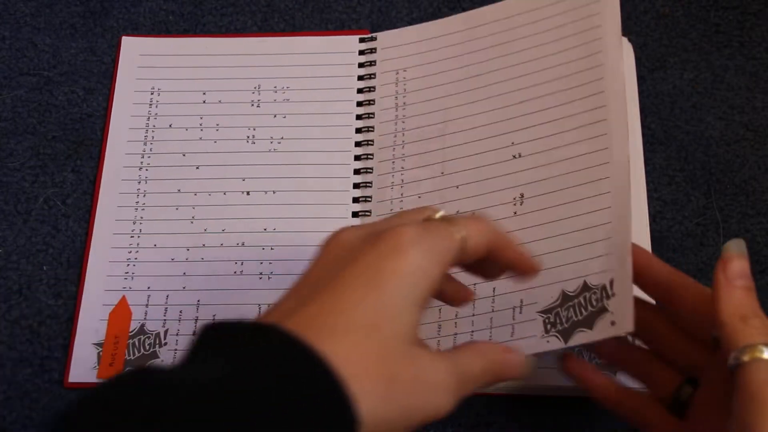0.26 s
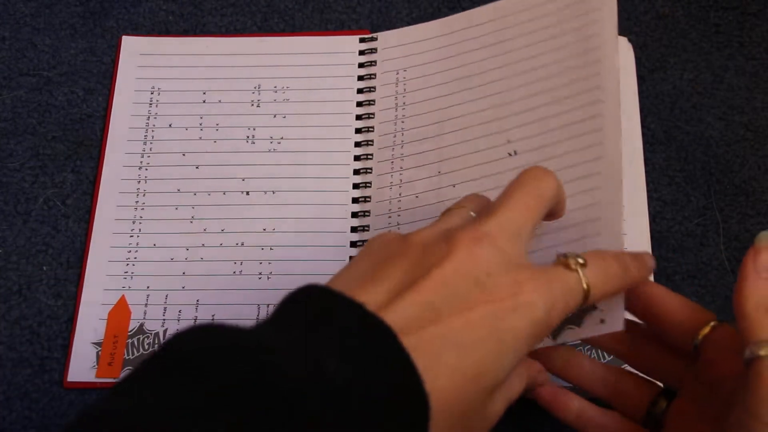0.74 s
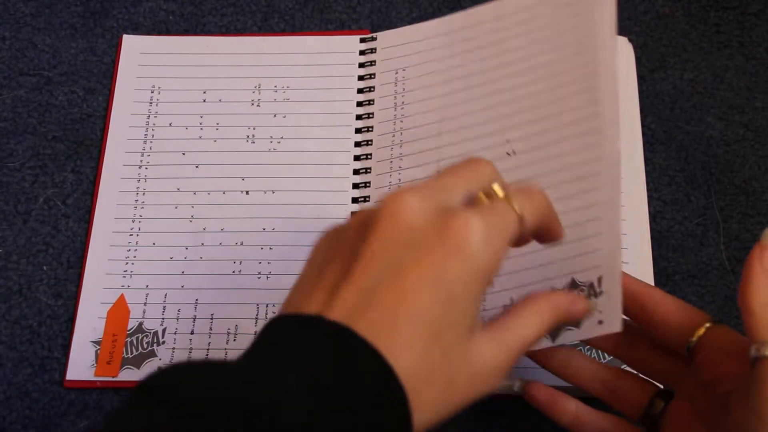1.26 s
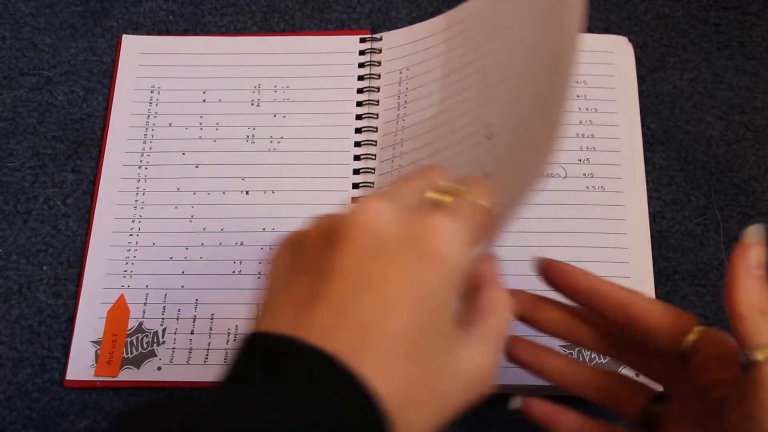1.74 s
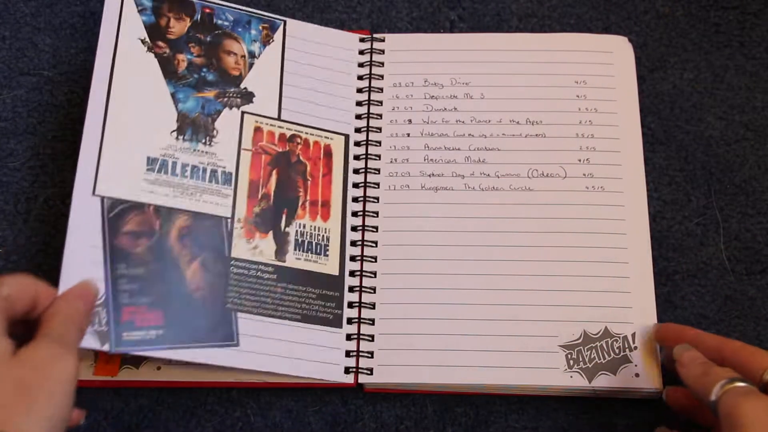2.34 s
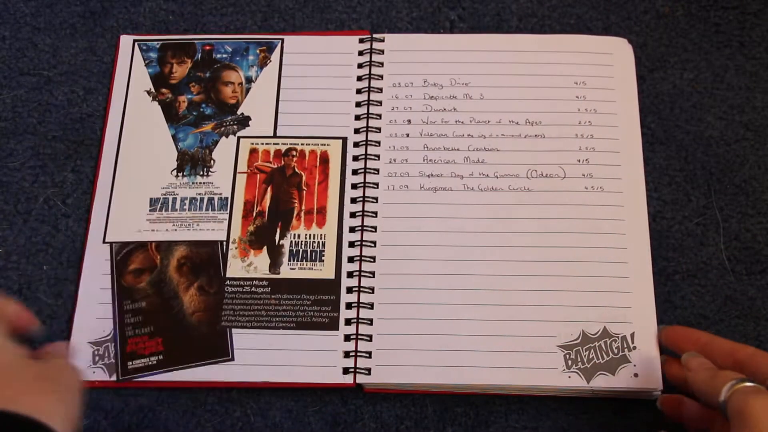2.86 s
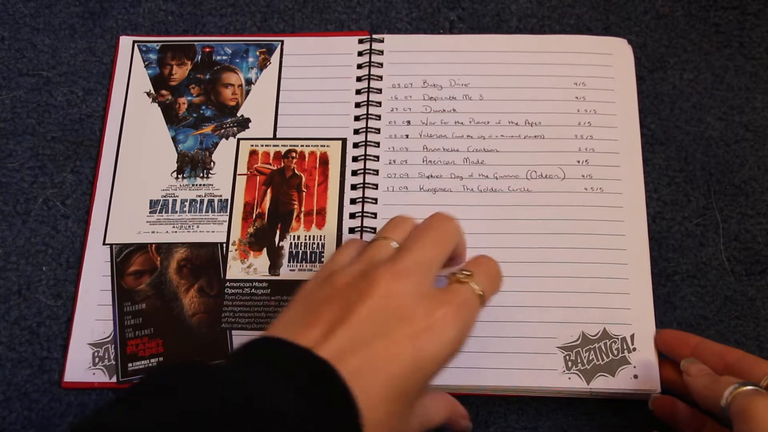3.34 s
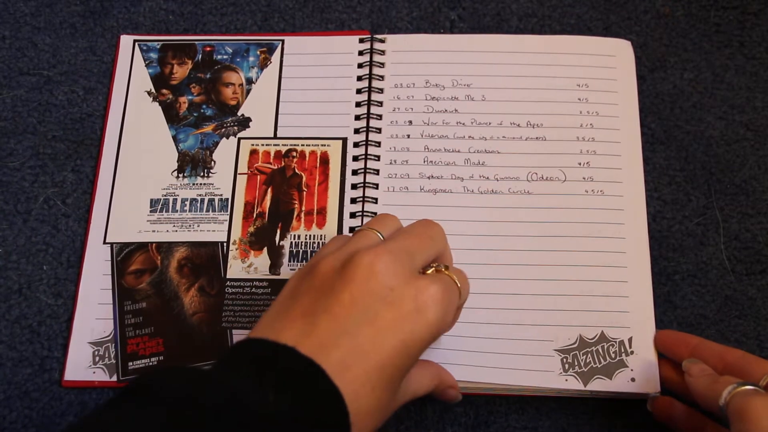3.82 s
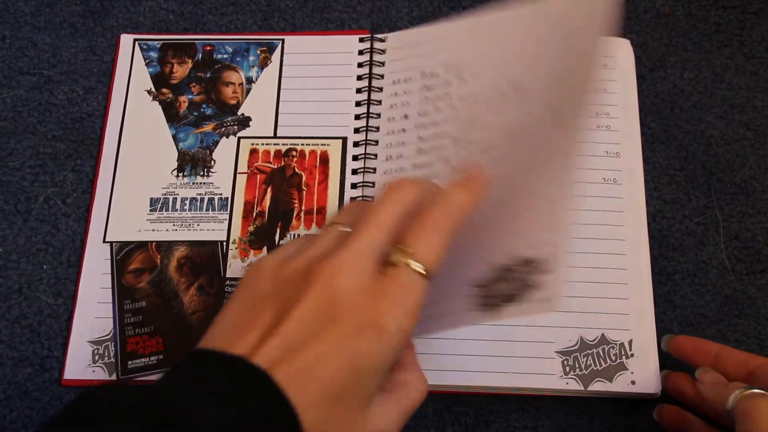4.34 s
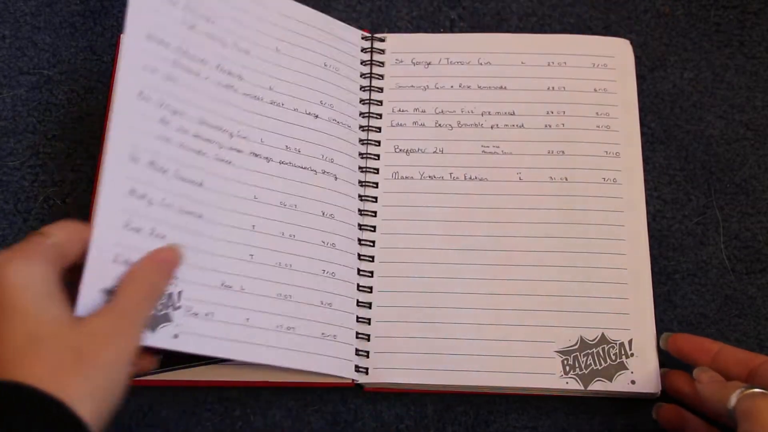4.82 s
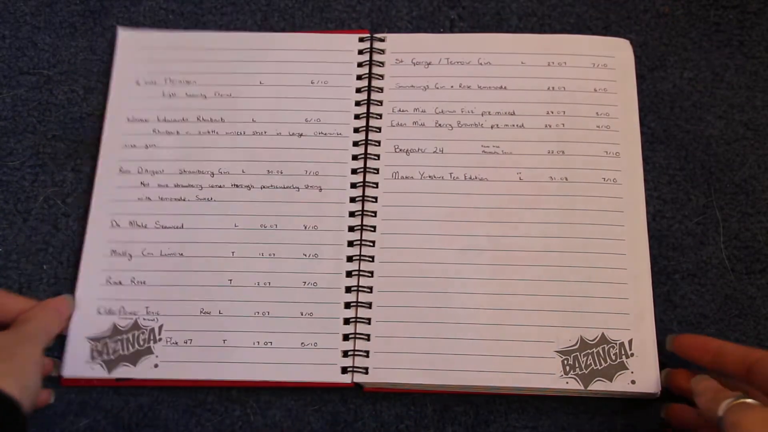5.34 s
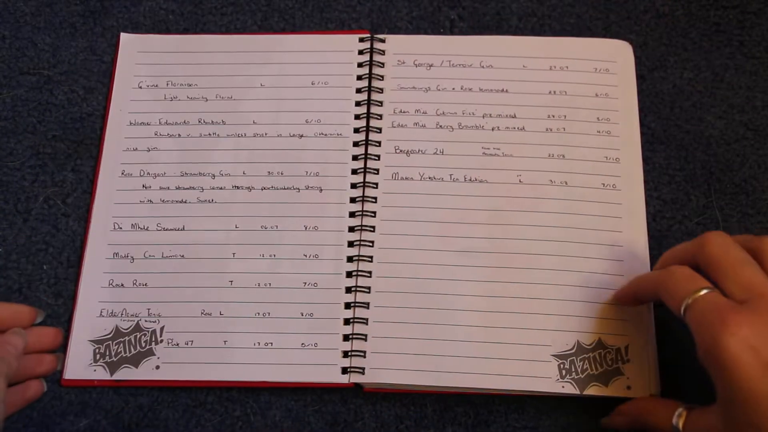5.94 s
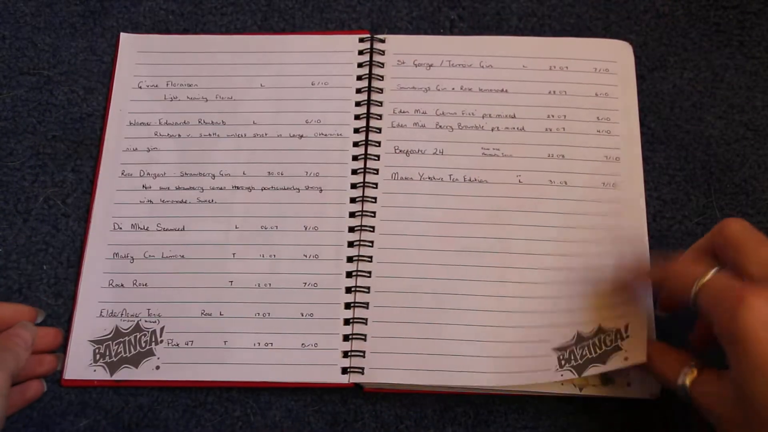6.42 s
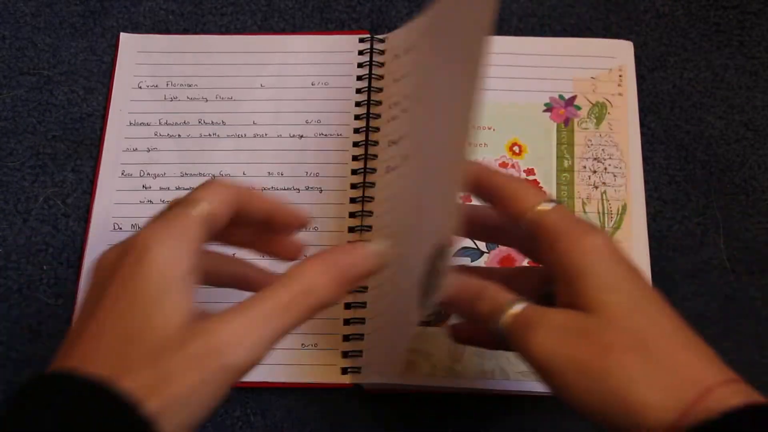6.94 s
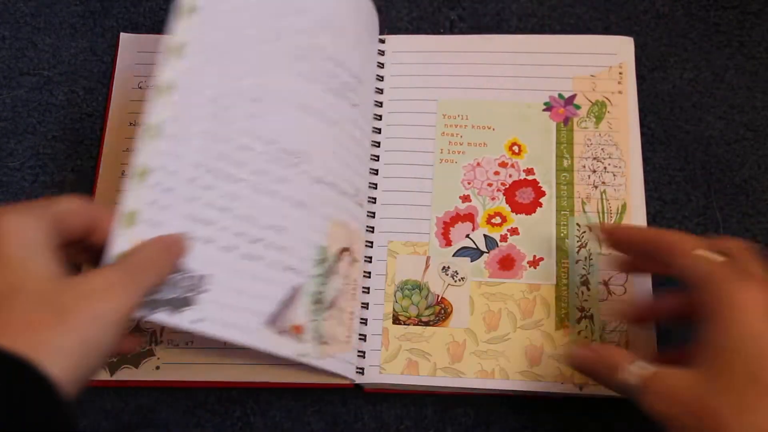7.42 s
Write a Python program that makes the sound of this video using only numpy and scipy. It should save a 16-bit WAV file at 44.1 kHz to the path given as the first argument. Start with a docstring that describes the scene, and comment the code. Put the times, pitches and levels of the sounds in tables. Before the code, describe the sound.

Pages of a wire-bound notebook are turned by hand, close up in a small carpeted room. Faint rubbing leads to a hard cluster of snaps just after one second, then swishing turns and flaps. After a near-quiet pause come brighter swishes with two loud cracks, and later a softer last turn ending in rapid crackling. Faint hiss and low hum lie underneath.

```python
"""Pages of a wire-bound notebook are lifted, turned and laid flat by hand on a carpet in a small quiet room.
From the start, low hum tones and noise-like hiss lie under the grainy swish of paper on paper and skin,
made of friction noise and random grains. Soon knocks and sharp snaps of buckling sheets ring as short
resonant bursts; from about 1 s narrow noise bands sing in the swish, and from 1.6 s bends crackle with
random ticks. Past 5 s a soft drone of resonant noise swells and fades while the paper goes on."""
import sys
import numpy as np
from scipy import signal
from scipy.io import wavfile

SR = 44100
rng = np.random.default_rng(int(sys.argv[2]) if len(sys.argv) > 2 else 0)


def makeup_ratio(level_db):
    """Linear amplitude ratio for a level in decibels (20 dB per factor of ten)."""
    decades = np.asarray(level_db, float) / 20
    return 10 ** decades


def unload_wav(signal):
    """Save mono or channel-first audio to the path in sys.argv[1] as 16-bit WAV at rate SR, clipped to [-1, 1]."""
    wavfile.write(
        sys.argv[1],
        SR,
        np.round(np.clip(np.atleast_2d(signal).T, -1, 1) * 32767).astype(np.int16),
    )


N = 338247   # length in samples

HALF_OCTAVES = 22 * 2 ** np.arange(0, 10.5, .5)   # band edges in Hz

# The four sliding parts, low to high: flexing sheet, rub, edge scrape, fine hiss: centre_hz
PART_CENTRES = [480, 1600, 4400, 10000]
# Balance of the four parts in an even stroke, re the stroke's base level: level_db
PART_BALANCE = [-17.5, -1.6, -0.85, -10.5]
# Floor of the four parts between strokes, before the colour: level_db
PART_FLOORS = [-94, -75, -70, -71]
# How far each of the four parts follows a stroke's brightness: factor (no unit)
BRIGHTNESS_FACTORS = [-1.8, -0.82, 0.15, 1.03]
# Strokes of paper over paper and skin: start_s, fastest_s, end_s, base_level_db, brightness_db (per unit factor)
STROKES_OF_PAPER = [(0, 0.048, 0.22, -55.5, -2.5), (0.21, 0.288, 0.39, -64.5, -4),
                    (0.54, 0.574, .6, -61, -11), (0.615, 0.616, 0.75, -56, -4.5),
                    (0.793, 0.869, 0.88, -58, -7), (.93, 0.94, 1.04, -61.5, -3),
                    (0.99, 1.037, 1.14, -57.5, -1), (1.085, 1.207, 1.22, -45, 0),
                    (1.49, 1.584, 1.63, -52, -5), (1.608, 1.642, 1.83, -49.5, -5),
                    (1.75, 1.82, 2.35, -58, -2.5), (1.933, 1.976, 2.06, -62, 3),
                    (2.03, 2.043, 2.06, -57, -2), (2.1, 2.105, 2.17, -55, 2), (2.15, 2.2, 2.42, -52, 0),
                    (2.244, 2.274, 2.43, -48, 2), (2.406, 2.497, 2.52, -55, -2.5),
                    (2.506, 2.552, 2.6, -68.5, -17.5), (2.574, 2.648, 2.75, -49.5, 0.5),
                    (2.705, 2.787, 2.95, -46.5, -0.5), (2.785, 2.824, 2.91, -40.5, 3),
                    (3.354, 3.368, 3.37, -58, -1), (3.423, 3.438, 3.57, -53.5, -4.5),
                    (3.52, 3.558, 3.62, -55.5, -9), (3.935, 3.938, 3.96, -55, 0),
                    (3.963, 4.028, 4.15, -55.5, 0), (4.143, 4.185, 4.21, -48, 0.5),
                    (4.207, 4.213, 4.28, -49, 2.5), (4.238, 4.287, 4.5, -52.5, 2.5),
                    (4.33, 4.381, 4.51, -47, 1.5), (4.512, 4.505, 4.66, -51, 1.5),
                    (4.56, 4.625, 4.9, -62, 9), (4.677, 4.72, 4.8, -52.5, -9.5),
                    (4.834, 4.906, 5.5, -52.5, 1.5), (4.94, 4.953, 5.1, -58, -14),
                    (4.961, 5.077, 5.1, -46, 2.5), (5.1, 5.152, 5.45, -44.5, 3.5),
                    (5.23, 5.352, 5.35, -44.5, 7.5), (5.484, 5.605, 5.8, -54.5, -1),
                    (5.698, 5.78, 5.83, -58, -3), (5.833, 5.848, 6.06, -57, -3.5),
                    (5.982, 6.013, 6.16, -58, -7.5), (6.197, 6.231, 6.2, -57.5, -4),
                    (6.313, 6.325, 6.52, -58.5, -6.5), (6.384, 6.445, 6.5, -45.5, 7),
                    (6.497, 6.576, 6.8, -53, 7), (6.781, 6.798, 6.95, -53.5, -6.5),
                    (6.926, 6.944, 7.05, -60.5, -6.5), (7.027, 7.143, 7.35, -52.5, 4),
                    (7.143, 7.165, 7.21, -58, -11.5), (7.215, 7.225, 7.27, -60.5, -16),
                    (7.25, 7.274, 7.4, -55, -10.5), (7.482, 7.493, 7.535, -51, -9),
                    (7.53, 7.616, 7.66, -52, -7)]
STROKE_ROUNDNESS = 1.37   # power on the rise and fall of a stroke's amplitude
STROKE_TAIL_T60_S, STROKE_TAIL_DB = 0.083, -8.5   # the room carries each stroke on
# Low rustle of flexing sheets and sleeves, before the colour: time_s, level_db
FLEXING_RUSTLE = [(0.0, -66), (1.54, -66), (1.69, -61), (1.96, -66), (2.33, -59), (3.07, -69.5), (3.5, -58),
                  (3.78, -70), (4.21, -61.5), (4.36, -58), (5.26, -66.5), (5.7, -61.5), (5.9, -56.5),
                  (6.26, -62), (6.58, -64.5), (7.2, -61), (7.35, -57), (7.67, -82)]
# Lift of the fine hiss of the strokes: time_s, lift_db
FINE_HISS_LIFT = [(0, .1), (1.0, 3), (1.18, 3), (1.6, 2.5), (2.1, 3.5), (2.35, -1), (2.6, -1), (2.85, -0.7),
                  (3.5, .1), (4.2, 2.5), (4.33, -10), (4.4, -2), (4.7, 2), (5.05, -6), (5.15, 1.5),
                  (5.35, -1.5), (5.6, -3), (5.75, 13.5), (6.0, 2), (6.33, 15), (6.45, .1), (6.6, -15),
                  (7.2, -3), (7.67, 12)]
# Relative spectrum of the swish: frequency_hz, level_db
SWISH_COLOUR = [(170, -3), (300, -6), (550, -4), (1000, -6), (3000, -3.5), (7000, -2), (11000, -3.5),
                (16000, -7)]
# Nominal left-right likeness of the swish: frequency_hz, likeness (-1 to 1)
SWISH_LIKENESS = [(250, 0.74), (1400, 0.84), (3000, 0.71), (7000, 0.28), (15000, 0.085)]
# Air pocket under the lifted sheet: time_s, peak_spacing_hz, echo_strength (no unit, negative = inverted)
AIR_POCKET = [(0, 2630, .08), (1.0, 1630, -0.025), (1.2, 1640, 0.46), (1.5, 1190, -0.15), (2.0, 2640, 0.03),
              (2.35, 2590, .32), (2.45, 1400, -0.086), (2.65, 1350, 0.24), (2.9, 1400, -0.11),
              (3.5, 980, 0.13), (4.3, 970, 0.27), (4.36, 2070, 0.15), (4.98, 1900, -0.021),
              (5.14, 1950, -0.017), (5.18, 1360, 0.069), (5.38, 1430, 0.092), (6.45, 3040, -0.13),
              (6.75, 1440, 0.16), (7.67, 1390, -0.21)]
# Room air and microphone hiss, relative spectral density: frequency_hz, level_db (per Hz)
HISS_SPECTRUM = [(15, -59), (30, -21), (60, -15), (97, -3.5), (141, -10.5), (185, -9.5), (354, -18.5),
                 (900, -18.5), (3000, -24.5), (8000, -32.5), (13000, -35.5), (16000, -50)]
# Left-right likeness of the hiss: frequency_hz, likeness (-1 to 1)
HISS_SIDES = [(60, 0.66), (130, 0.48), (290, -0.5), (640, -0.57), (1410, -0.44), (3100, -0.53),
              (6820, -0.33), (15000, -0.099)]
# Low hum tones: pitch_hz, level_db (rms before the waver), waver_db
HUM_TONES = [(89.5, -71, 2), (99.3, -66, 1.5), (126, -93, -5)]
# Echoes from the nearest walls: delay_s, level_db (re direct)
WALL_ECHOES = [(0.0105, -25.5), (0.0198, -19)]
# Reverberation time of the room: frequency_hz, t60_s
REVERBERATION = [(300, 0.17), (800, 0.14), (2000, 0.13), (5500, 0.14), (12000, 0.19)]
TAIL_MID_DB, TAIL_SIDE_DB, WALL_DULL_HZ = -8, -19.5, 8050
CAPSULE_SIDE_DB, CAPSULE_SIDE_HZ = 10.5, 16700
# Knocks on the stack of pages: time_s, peak_db (of the stack alone, before the room)
KNOCKS = [(0.379, -46), (0.446, -35), (1.194, -24), (1.204, -25), (1.533, -30.5), (2.21, -42.5),
          (2.357, -42), (4.698, -44), (4.809, -49), (4.942, -45), (6.844, -41), (7.149, -46), (7.236, -45),
          (7.408, -32)]
# Buckles and catches: time_s, peak_db (of the burst before the room), ring_hz,
# body_db, crack_db (balance settings, before the fixed gains in snaps())
BUCKLES = [(0.382, -41, 1440, -30, -19), (0.448, -35, 1150, 4, -23), (.626, -39.5, 2140, -5, -25),
           (0.677, -42, 2880, -16, -5), (.881, -39, 2370, -19, -19), (.902, -43, 2500, -1, -17),
           (1.184, -28.5, 1770, 2, -3), (1.193, -15, 4770, -4, -12), (1.198, -12, 3640, -5.5, -37),
           (1.204, -11, 1080, 12, -19), (1.21, -19, 2200, 14, -28), (1.219, -22, 2220, -22, -15),
           (1.528, -34, 1080, -8, -29), (1.533, -28, 1050, 1, -10.5), (1.711, -35.5, 2500, -25, -15),
           (1.744, -35.5, 2540, -12, -16), (1.943, -38, 1050, -20, 0.5), (2.052, -36.5, 2880, -28, -11),
           (2.189, -30.5, 2530, -1, -3), (2.21, -21, 1470, 1, -6), (2.263, -29, 4940, -4, -16),
           (2.3, -30.5, 2600, 1, -3), (2.356, -13.5, 2400, 3.5, -4.5), (2.869, -29, 2300, -33, -25),
           (4.171, -30.5, 4900, -28, -15), (4.199, -35, 2000, -18, -13), (4.489, -29.5, 5050, -7, -16),
           (4.52, -34.5, 2540, -19, -8), (4.532, -31, 2860, -8, -14), (4.576, -33.5, 3140, -15, -15),
           (4.615, -29.5, 2880, -7, -4), (4.633, -31, 1150, -12, -11), (4.696, -22.5, 4320, -7.5, -31),
           (4.711, -35, 686, -8, -11), (4.756, -22.5, 2470, -14, -2.5), (4.809, -7.5, 4470, -0.5, -7.5),
           (4.943, -8, 2630, 5, -4.5), (6.309, -43.5, 2180, -23, -18), (6.401, -32.5, 1700, -7, 0),
           (6.45, -35, 1550, -17, -6), (6.797, -39, 2200, -16, -4), (6.845, -26, 1780, -15, -23),
           (7.147, -35.5, 910, 1, -11), (7.259, -37, 3370, -5, -15), (7.292, -42, 1270, -30, -28),
           (7.406, -28.5, 960, -30, -18), (7.414, -27.5, 1000, -4.5, -13), (7.513, -28, 1430, -16, -37),
           (7.544, -41, 1430, -12, -23), (7.556, -24.5, 1410, -11, -20), (7.57, -27.5, 1040, -12, -38),
           (7.586, -28.5, 1500, 3, -33), (7.607, -28, 2390, 15, -24), (7.654, -34.5, 990, -5, -10)]
BURST_T60_S, BURST_SHARPENS = 0.019, 0.57   # at a ring of 1500 Hz; power by which higher rings are shorter
# Narrow bands that sing in the swish: start_s, end_s, centre_hz, level_db (re rub part)
SINGING_BANDS = [(0.997, 1.1, 4440, -6), (1.104, 1.175, 1850, -6), (1.11, 1.197, 3000, -10),
                 (1.1, 1.196, 4800, -6), (1.11, 1.19, 8340, -12), (2.44, 2.73, 1380, -5),
                 (2.738, 2.866, 1470, -7.5), (4.202, 4.45, 2170, -6), (4.35, 4.46, 3970, -22),
                 (5.0, 5.124, 5600, -6), (5.149, 5.37, 5630, -6), (4.998, 5.173, 1840, -4.5),
                 (5.123, 5.327, 2940, -6), (6.491, 6.63, 3280, 0), (6.617, 6.73, 2500, -4),
                 (7.047, 7.178, 2270, -2)]
SINGING_WIDTH_HZ, SINGING_FADE_S = 420, 0.023
# Random crackle of a bending sheet: start_s, end_s, ticks_per_s, level_db (rms), centre_hz
CRACKLE_SPELLS = [(1.601, 1.77, 150, -63, 2300), (2.796, 2.884, 250, -54.5, 3200),
                  (4.685, 4.761, 200, -57.5, 810), (7.22, 7.31, 150, -52.5, 880),
                  (7.48, 7.638, 500, -49.5, 1490)]
CRACKLE_SPREAD_DB, CRACKLE_WIDTH = 6.5, 0.82   # width as a share of the centre frequency
# Course of the soft drone, held level beyond its ends: time_s, level_db (rms)
DRONE_COURSE = [(5.3, -71), (5.45, -60.5), (5.8, -63), (6.05, -62), (6.2, -91)]


def rms_one(x):
    """Normalise the mean power to one."""
    return x / np.sqrt(np.mean(x ** 2) + 1e-20)


def peak_at(x, db):
    """Scale the largest excursion to a given peak level."""
    return makeup_ratio(db) * x / np.abs(x).max()


def at_hz(points, hz):
    """Interpolate a spectrum linearly along a logarithmic frequency axis."""
    points = np.array(points)
    return np.interp(np.log(hz), np.log(points[:, 0]), points[:, 1])


def at_time(points, s):
    """Interpolate a level course linearly in time."""
    return np.interp(s, *np.transpose(points))


def band(x, low_hz, high_hz):
    """Band-pass filtering: only components between two edges are transmitted."""
    edges = [low_hz, min(high_hz, .9 * SR / 2)]
    return signal.sosfilt(signal.butter(2, edges, "band", fs=SR, output="sos"), x)


def resonance(x, hz, width_hz):
    """Damped resonance: a two-pole peak with gain near 1 on top."""
    r = np.exp(-np.pi * width_hz / SR)
    poles = [1, -2 * r * np.cos(2 * np.pi * hz / SR), r * r]
    return signal.lfilter(np.array([1, 0, -1]) * (1 - r * r) / 2, poles, x)


def drift(rate_hz):
    """Slow random fluctuation of spread 1: low-passed noise, computed at every 40th sample."""
    r = np.exp(-80 * np.pi * rate_hz / SR)
    white = rng.standard_normal(N // 40 + 2002)
    slow = signal.lfilter([1], [1, -2 * r, r * r], white)[2000:]   # the filter has settled
    return np.interp(np.arange(N) / 40, np.arange(len(slow)), rms_one(slow))


def pocket_echo(x):
    """Comb filtering: sound bounces in the wedge of air between sheet and page, which opens and closes."""
    s, spacing_hz, strength = np.transpose(AIR_POCKET)
    n = np.arange(N)
    lag = SR / np.interp(n / SR, s, spacing_hz)
    gain = np.clip(np.interp(n / SR, s, strength), -.9, .9)
    bounces = 0
    for trips in range(5):
        delayed = np.array([np.interp(n - trips * lag, n, row) for row in x])
        bounces = bounces + gain ** trips * delayed
    return bounces * np.sqrt(1 - gain ** 2)   # about equal power at any strength


def slide_levels():
    """Friction noise grows with sliding speed: strokes add power to four parts, each at its own brightness."""
    s = np.arange(0, N / SR + .002, .002)
    power = makeup_ratio(np.array(PART_FLOORS))[:, None] ** 2 + 0 * s
    power[0] += makeup_ratio(at_time(FLEXING_RUSTLE, s)) ** 2
    for start, fastest, end, db, bright_db in STROKES_OF_PAPER:
        rise = (s - start) / max(fastest - start, .002)
        fall = (end - s) / max(end - fastest, .002)
        speed = np.clip(np.minimum(rise, fall), 0, 1)
        parts = makeup_ratio(db + np.array(PART_BALANCE) + bright_db * np.array(BRIGHTNESS_FACTORS))
        power += (parts[:, None] * np.sin(np.pi / 2 * speed) ** STROKE_ROUNDNESS) ** 2
    floor = power[3].min()
    power[3] = (power[3] - floor) * makeup_ratio(at_time(FINE_HISS_LIFT, s)) ** 2 + floor
    keep = makeup_ratio(-120 * (s[1] - s[0]) / STROKE_TAIL_T60_S)   # power kept from one step to the next
    tail = signal.lfilter([1 - keep], [1, -keep], power)
    return s, 10 * np.log10(power + makeup_ratio(STROKE_TAIL_DB) ** 2 * tail)


def sliding(grains_per_s, spread_db, grain_share, patchy_db):
    """Stick-slip: friction noise and grains, combed by the air pocket; a wide contact makes the sides differ."""
    sizes = makeup_ratio(spread_db * np.minimum(rng.exponential(1, N), 5)) * rng.choice([-1, 1], N)
    grains = sizes * (rng.random(N) < grains_per_s * makeup_ratio(2.5 * drift(25)) / SR)
    # rows are mid and side; the grains lie in the middle
    force = np.sqrt(grain_share) * rms_one(grains) * [[1], [0]]
    force = force + np.sqrt(1 - grain_share) * rng.standard_normal((2, N))
    force = pocket_echo(force)
    s, levels = slide_levels()
    out, together = 0, drift(22.0)
    for turn, (low, high) in enumerate(zip(HALF_OCTAVES[6:], HALF_OCTAVES[7:])):
        hz = np.sqrt(low * high)
        # each band takes its level from the two sliding parts around it
        place = np.interp(np.log(hz), np.log(PART_CENTRES), np.arange(4))
        k = min(int(place), 2)
        blend = np.sin(np.pi / 2 * (place - k)) ** 2
        db = levels[k] + blend * (levels[k + 1] - levels[k])
        db = np.interp(np.arange(N) / SR, s, db) + at_hz(SWISH_COLOUR, hz) - 6.5
        db = db + patchy_db * (0.53 * together + drift(30))
        even = np.sqrt(SR / 2 / (high - low)) * (-1) ** turn   # equal power; neighbours in opposite sign
        mid, side = band(force, low, high) * even
        alike = np.clip(at_hz(SWISH_LIKENESS, hz), -.9, 1)
        out = out + makeup_ratio(db) * (mid + np.sqrt((1 - alike) / (1 + alike)) * side * [[1], [-1]])
    return out


def hiss():
    """Stationary noise of room air and microphone, partly out of phase between the sides."""
    out, white = 0, rng.standard_normal((2, 2, N))
    for k, (low, high) in enumerate(zip(HALF_OCTAVES, HALF_OCTAVES[1:])):
        mid, side = band(white[k % 2], low, high)
        hz = np.sqrt(low * high)
        alike = np.clip(at_hz(HISS_SIDES, hz), -.99, .99)
        sides = np.sqrt(1 + alike) * mid + np.sqrt(1 - alike) * side * [[1], [-1]]
        out = out + makeup_ratio(at_hz(HISS_SPECTRUM, hz)) * sides / np.sqrt(1 + alike)
    return makeup_ratio(-59) * out / np.std(out.mean(axis=0))   # rms of the mean of both sides


def hum():
    """Superposition of three low tones, wavering slowly in level, that beat with each other."""
    t, out = np.arange(N) / SR, 0
    for hz, db, waver_db in HUM_TONES:
        level = np.sqrt(2) * makeup_ratio(db + waver_db * drift(1.2))
        out = out + level * np.sin(2 * np.pi * (hz * t + rng.random()))
    return out


def room_responses(count):
    """Reverberation: direct sound, two wall echoes and a diffuse tail dying band by band, at two microphones."""
    t = np.arange(round(.2 * SR)) / SR
    white = rng.standard_normal((count, 2, len(t)))
    tail = 0
    for turn, (low, high) in enumerate(zip(HALF_OCTAVES[4::2], HALF_OCTAVES[6::2])):
        decay = makeup_ratio(-60 * t / at_hz(REVERBERATION, np.sqrt(low * high)))
        tail = tail + band(white, low, high) * decay * (-1) ** turn
    tail = signal.sosfilt(signal.butter(1, WALL_DULL_HZ, fs=SR, output="sos"), tail)
    tail = tail * np.clip(t / 0.0036, 0, 1)   # the tail builds up over 3.6 ms
    tail = tail / np.sqrt(np.sum(tail ** 2, axis=2, keepdims=True))
    tail = makeup_ratio([[TAIL_MID_DB], [TAIL_SIDE_DB]]) * tail
    mid, side = tail[:, 0], tail[:, 1]
    mid[:, 0] += 1   # direct sound
    for s, db in WALL_ECHOES:
        mid[:, round(s * SR)] += makeup_ratio(db)
    # the treble reaches one capsule or the other first
    ahead = rng.choice([-1, 1], (count, 1))
    treble = signal.sosfilt(signal.butter(1, CAPSULE_SIDE_HZ, "high", fs=SR, output="sos"), mid)
    side = side + ahead * makeup_ratio(CAPSULE_SIDE_DB) * treble
    return np.stack([mid + side, mid - side], axis=1)


def in_room(times, sounds, lag_s):
    """Convolution: each sound is spread by a room response of its own, as from its own place."""
    out = np.zeros((2, N + SR))
    for s, sound, room in zip(times, sounds, room_responses(count=len(times))):
        sound = signal.fftconvolve(sound[None], room, axes=1)
        i = round((s + lag_s) * SR)
        out[:, i:i + sound.shape[1]] += sound
    return out[:, :N]


def thumps(lag_s):
    """Impact excitation: a knock sets the stack of pages and the cover below it on the carpet going."""
    t = np.arange(1536) / SR
    bursts = rng.standard_normal((len(KNOCKS), len(t))) * makeup_ratio(-60 * t / 0.005)
    sounds = []
    for (s, db), burst in zip(KNOCKS, bursts):
        stack = peak_at(resonance(burst, 344, 187), db)
        cover = peak_at(resonance(burst, 174, 53), db - 16.5)
        sounds.append(stack + cover)
    return in_room([row[0] for row in KNOCKS], sounds, lag_s)


def snaps(ring_width, ring_db, jolt, lag_s):
    """Sudden release of a buckle: a short burst excites a ring at its own pitch, a body and a crack."""
    t, sounds = np.arange(1536) / SR, []
    noise = rng.standard_normal((len(BUCKLES), len(t)))
    noise[:, :3] = jolt   # the sheet gives way with one hard first jolt
    for (s, db, hz, body_db, crack_db), burst in zip(BUCKLES, noise):
        burst = burst * makeup_ratio(-60 * t / (BURST_T60_S * (1500 / hz) ** BURST_SHARPENS))
        ring = resonance(resonance(burst, hz, ring_width * hz), hz, hz)
        body = band(band(burst, 780, 3700), 600, 5100)
        crack = band(burst * makeup_ratio(-60 * t / 0.0043), 3300, 12700)   # the treble dies first
        snap = peak_at(ring, ring_db) + peak_at(body, body_db + 2.0) + peak_at(crack, crack_db + 8.0)
        sounds.append(peak_at(snap, db))
    return in_room([row[0] for row in BUCKLES], sounds, lag_s)


def singing():
    """Selective resonance: noise twice through a narrow peak, its level following the rub that drives it."""
    s, levels = slide_levels()
    out = np.zeros(N)
    for start, end, hz, db in SINGING_BANDS:
        i = np.arange(round(start * SR), round(end * SR))
        noise = rng.standard_normal(SR // 2)
        noise = resonance(resonance(noise, hz, SINGING_WIDTH_HZ), hz, SINGING_WIDTH_HZ)
        fade = np.clip(np.minimum(i / SR - start, end - i / SR) / SINGING_FADE_S, 0, 1)
        rub_db = np.interp(i / SR, s, levels[1])
        out[i] += makeup_ratio(db + rub_db) * fade * rms_one(noise)[:len(i)]
    return out


def crackles():
    """Random impulses: uneven ticks of a bending sheet excite a broad resonance."""
    out = np.zeros(N)
    for start, end, per_s, db, hz in CRACKLE_SPELLS:
        i = np.arange(round(start * SR), round(end * SR))
        chance, size, sign = rng.random((3, SR // 4))[:, :len(i)]
        sizes = makeup_ratio(CRACKLE_SPREAD_DB * np.minimum(-np.log(size + 1e-9), 3))
        ticks = (chance < per_s / SR) * sizes * np.sign(sign - .5)
        width_hz = CRACKLE_WIDTH * hz
        out[i] += makeup_ratio(db) * rms_one(resonance(resonance(ticks, hz, width_hz), hz, width_hz))
    return out


def drone():
    """Resonant filtering: noise twice through one peak gives a soft drone that swells and fades."""
    hz, width_hz = 539, 150
    noise = resonance(resonance(rng.standard_normal(N), hz, width_hz), hz, width_hz)
    return makeup_ratio(at_time(DRONE_COURSE, np.arange(N) / SR)) * rms_one(noise)


def scene():
    """Superposition: the paper sounds, low-passed and slightly panned, add to hiss, hum and drone."""
    paper = sliding(grains_per_s=3000, spread_db=6.0, grain_share=0.21, patchy_db=1.5)
    paper = paper + thumps(lag_s=.0007)
    paper = paper + snaps(ring_width=0.39, ring_db=-3.0, jolt=2.38, lag_s=.0007)
    paper = paper + singing() + crackles()
    paper = signal.sosfilt(signal.butter(2, 10700, fs=SR, output="sos"), paper)   # the top treble is weak
    pan = makeup_ratio(np.array([[-0.4], [0.4]]))   # left and right, in dB
    return paper * pan + hiss() + hum() + drone()


def low_pass(x):
    """Removes everything above the highest recorded frequency."""
    return signal.sosfilt(signal.butter(12, 16550, fs=SR, output="sos"), x)


def record(dry):
    """The finished mix is recorded with no further gain."""
    return low_pass(dry)


dry = scene()
out = record(dry)
unload_wav(out)
```